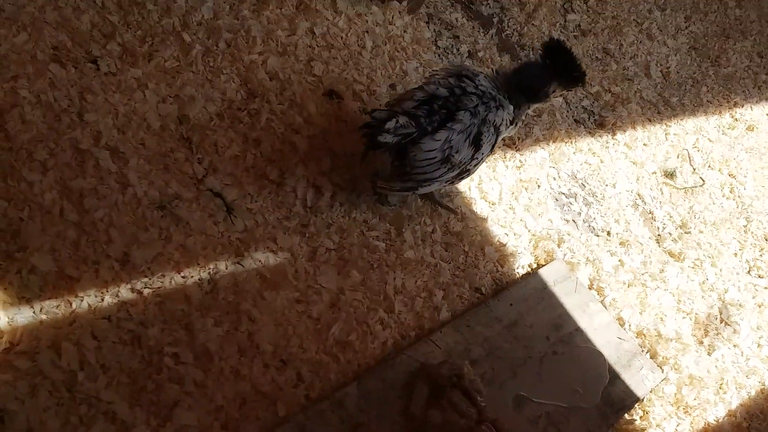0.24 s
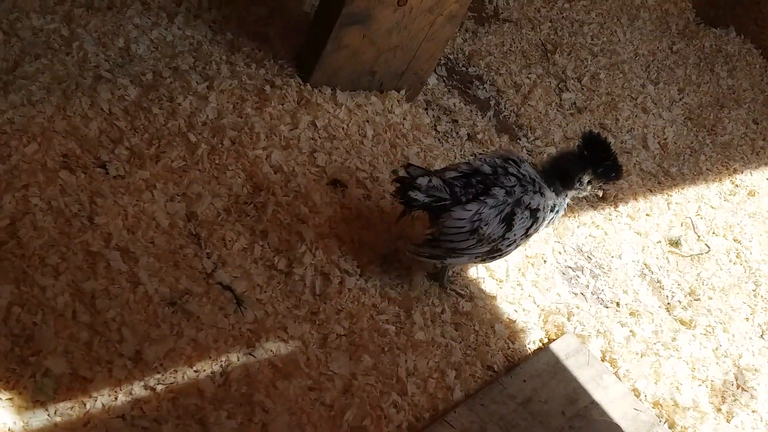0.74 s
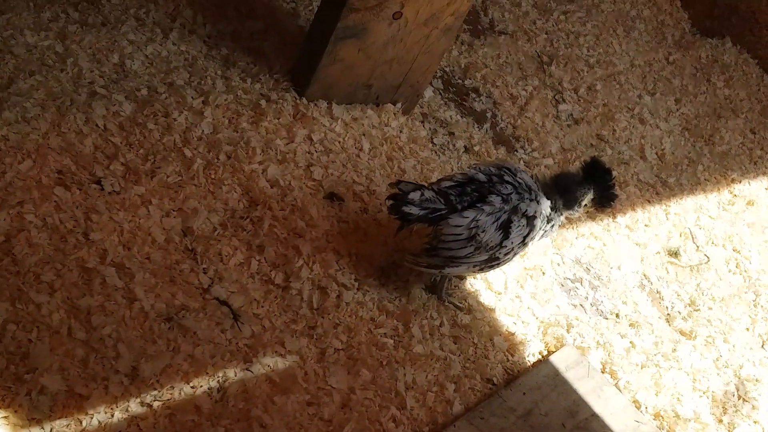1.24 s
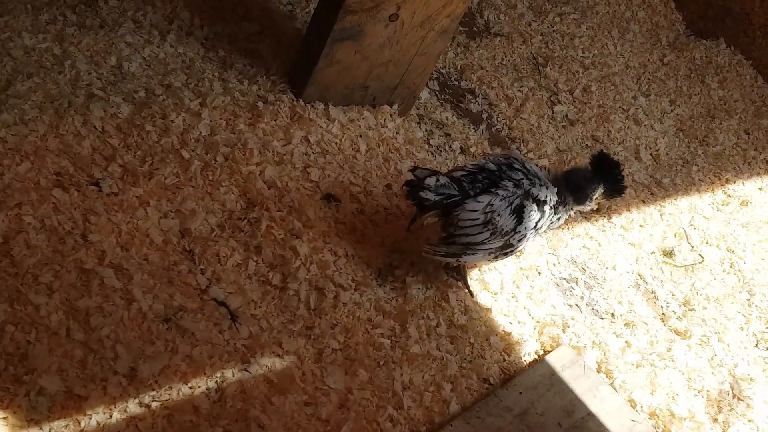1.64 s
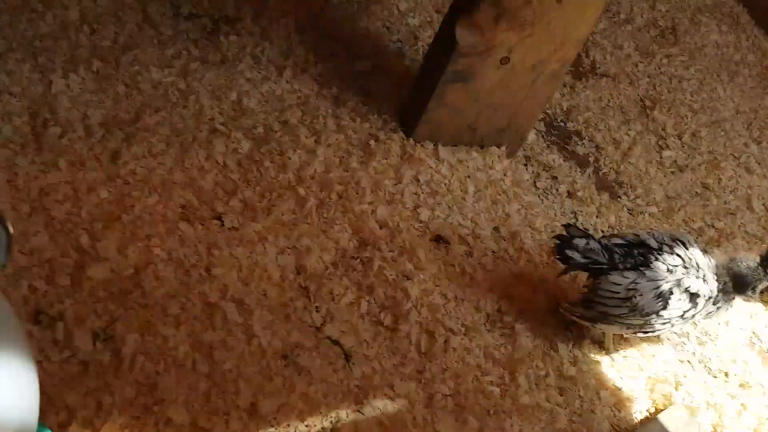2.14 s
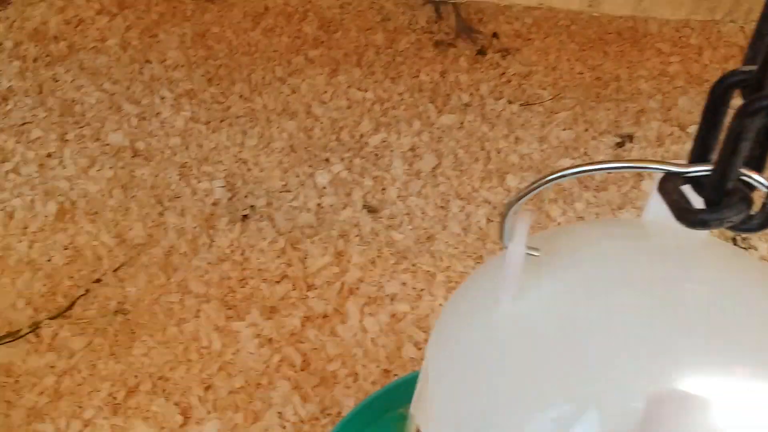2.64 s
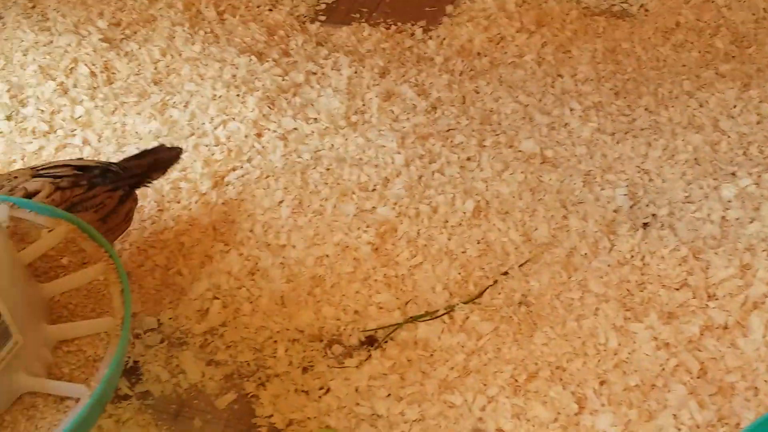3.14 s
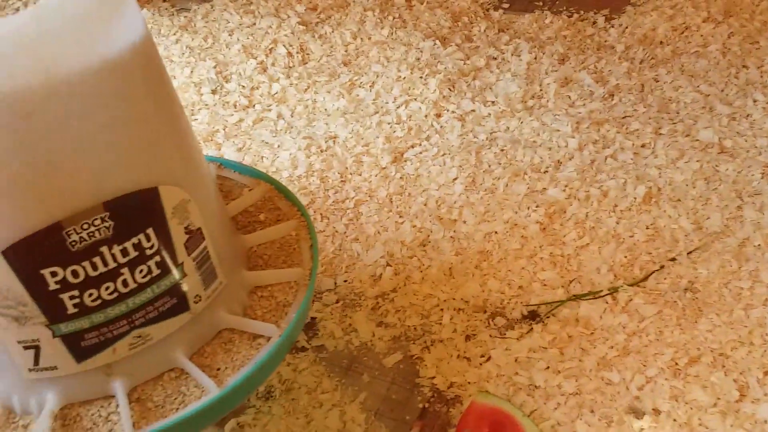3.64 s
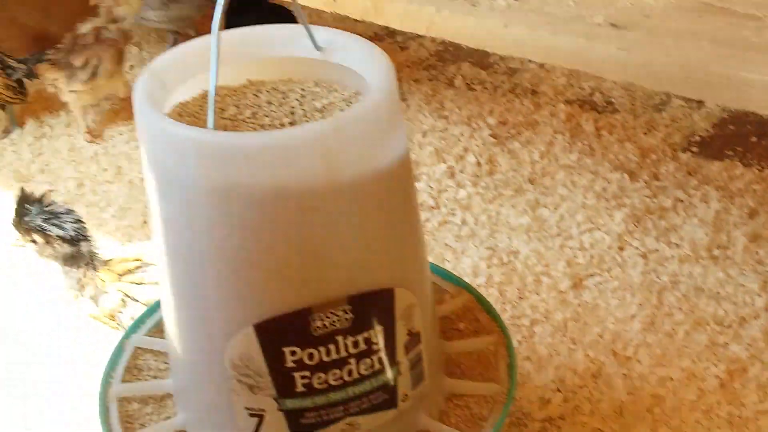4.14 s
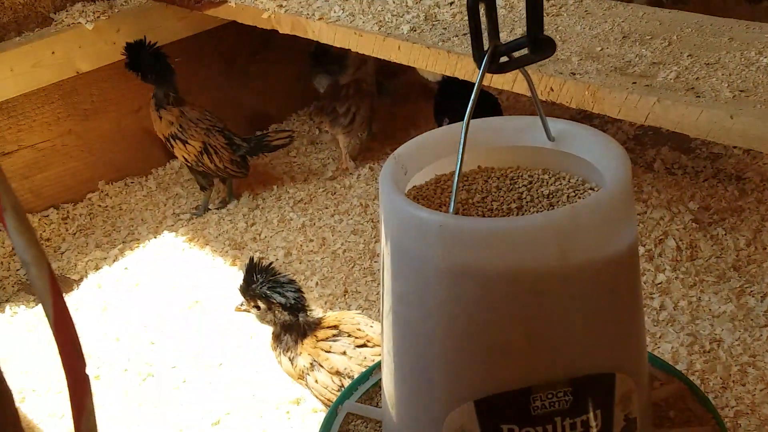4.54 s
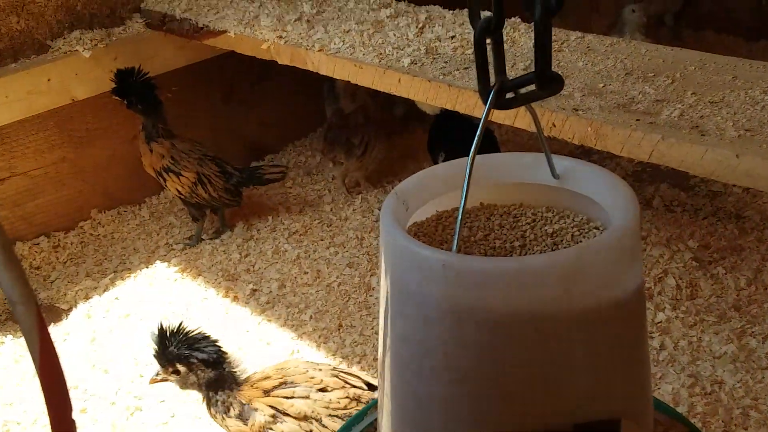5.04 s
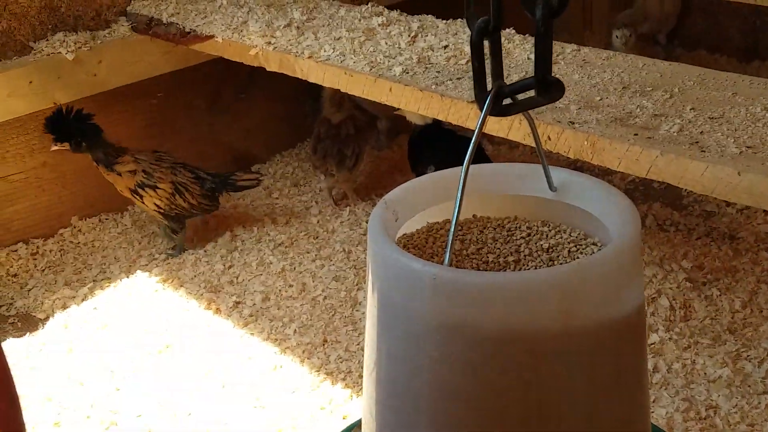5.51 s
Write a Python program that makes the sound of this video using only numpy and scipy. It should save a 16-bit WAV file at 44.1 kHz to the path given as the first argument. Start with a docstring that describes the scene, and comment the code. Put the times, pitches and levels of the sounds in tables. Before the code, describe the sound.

In a small wooden coop, chicks peep from the start: tiny whistles falling from roughly 3-4 kHz to 2 kHz, irregular and often overlapping, with a short close echo. Beneath lie a faint low murmur, fine litter hiss, soft board rumbles and light scuffs in shavings. At 1.5 s one piercing squeak plunges and rings through the coop, with a weaker one at 1.7 s. Handling noise bursts in around 2.0-2.4 s: a dull bump, a sharp nail click and rasping finger strokes on the left, then darker rubbing and the heaviest thumps on the right. Lighter leftward rubs follow until 3.2 s, with small ticks near 2.9-3.0 s, and another brushes past at 3.9 s. Peeps continue busily from 2.3 to 5 s, now leaning right, joined by soft low notes from older birds. A faint hoarse chirr comes at 5.15 s, a low cluck at 5.3 s, then near quiet and two faint peeps around 5.65 s.

```python
"""In a small wooden coop, young chickens peep: short falling whistles that overlap and smear between the walls.
Each call is a gliding tone with overtones, convolved with random wall reflections and a diffuse tail.
Older birds add soft low notes, and coloured noise makes the litter, the feet in the shavings and the boards.
At the hand-held camera itself, a finger rubs first one microphone port, then the other; its case bumps
and clicks as decaying sines."""
import sys
import numpy as np
from scipy import signal
from scipy.fft import rfft, irfft, next_fast_len
from scipy.io import wavfile
from scipy.ndimage import map_coordinates

SR = 44100
rng = np.random.default_rng(int(sys.argv[2]) if len(sys.argv) > 2 else 0)


def generate_wav(sig):
    """Save sig (samples, or channels by samples) to the path in sys.argv[1] as 16-bit PCM at SR."""
    pcm = np.round(np.clip(np.atleast_2d(sig).T, -1, 1) * 32767).astype(np.int16)
    wavfile.write(sys.argv[1], SR, pcm)


N = 254699
TIME = np.arange(N) / SR  # seconds


def amp(db):
    """Decibels to a linear gain."""
    return 10 ** (np.asarray(db) / 20)


def unit(x):
    """Scale a sound to an rms of 1."""
    return x / np.sqrt(np.mean(x ** 2) + 1e-20)


def along(points, hz):
    """Read a curve of (Hz, value) points on a log frequency axis."""
    point_hz, values = np.transpose(points)
    return np.interp(np.log(hz + 1), np.log(point_hz + 1), values)


def wobble(rate, size=N):
    """A smooth random curve with this many random knots a second."""
    knots = rng.standard_normal(int(size * rate / SR) + 4)
    return map_coordinates(knots, [np.arange(size) * rate / SR])


def filtered(x, response):
    """Multiply the spectrum by a response of frequency."""
    size = next_fast_len(N + 8192)
    spectrum = rfft(x, size) * response(np.fft.rfftfreq(size, 1 / SR))
    return irfft(spectrum, size)[..., :N]


def panned(balance_db):
    """Left and right gains of mean power 1; a positive balance leans left."""
    return unit(amp([[balance_db / 2], [-balance_db / 2]]))


def add(track, s, sound):
    """Mix a sound into the track at s seconds, cutting what falls outside."""
    start = round(s * SR)
    part = sound[..., max(-start, 0):N - start]
    first = max(start, 0)
    track[..., first:first + part.shape[-1]] += part


# How alike the two ports hear a noise. Each row: frequency in Hz, left-right likeness (1 is identical).
LIKENESS = [(60, 0.9), (200, 0.92), (700, 0.53), (3000, 0.078), (10000, 0.33)]


def noise(gain_db, alike=LIKENESS):
    """Stereo noise of rms 1, coloured by a dB function of frequency; mid and side set its width."""
    def turn(hz):
        return np.arccos(np.clip(along(alike, hz), -1, 1)) / 2

    def mid_and_side(hz):
        return amp(gain_db(hz)) * [np.cos(turn(hz)), np.sin(turn(hz))]
    mid, side = filtered(rng.standard_normal((2, N)), mid_and_side)
    return unit(np.array([mid + side, mid - side]))


def swells(rows):
    """A soft half-sine hump of gain for each (start s, length s, dB) row."""
    gain = 0
    for s, length, db in rows:
        gain = gain + amp(db) * np.sin(np.pi * np.clip((TIME - s) / length, 0, 1))
    return gain


# Colour of the coop's air and litter. Each row: frequency in Hz, relative gain in dB.
COOP_COLOUR = [(15, -54), (25, -18.5), (110, 3), (205, -14.5), (670, -11.5), (878, -9.5), (1090, -16),
               (1180, -13), (1430, -13.5), (1970, -18), (3120, -22), (4300, -25.5), (7180, -27),
               (9410, -30.5), (15700, -26.5)]
# The litter's hiss as it comes and goes. Each row: time in seconds, level in dB before hiss_db.
LITTER_LEVEL = [(0, -68.5), (.35, -73.5), (.7, -71), (1.3, -71), (1.7, -76.5), (2.2, -70), (3.1, -71.5),
                (3.45, -65.5), (3.8, -69), (4.15, -66), (4.5, -76.5), (5.05, -73), (5.78, -77)]


def background(murmur_db=-65, murmur_follows=0.44, hiss_db=6, split_hz=3500, balance_db=-2):
    """The litter's fine hiss and the coop's low murmur, which partly follows the hiss in level."""
    level_db = np.interp(TIME, *np.transpose(LITTER_LEVEL))
    murmur = noise(lambda hz: along(COOP_COLOUR, hz) - 10 * np.log10(1 + (hz / split_hz) ** 4))
    hiss = noise(lambda hz: along(COOP_COLOUR, hz) - 10 * np.log10(1 + (split_hz / (hz + 1)) ** 4))
    follow_db = murmur_follows * (level_db - level_db.mean())
    murmur = murmur * amp(murmur_db + follow_db + wobble(12))
    hiss = hiss * amp(level_db + hiss_db + 0.64 * wobble(23))
    return panned(balance_db) * (murmur + hiss)


# Weight shifting on the floor boards. Each row: start in seconds, length in seconds, level in dB.
TREAD_TIMES = [(0, 0.081, -60), (.54, 0.053, -61.5), (.66, 0.16, -61), (.79, 0.073, -60.5),
               (1.27, 0.11, -57), (2.8, 0.061, -62.5)]
# Colour of the boards. Each row: frequency in Hz, relative gain in dB.
BOARD_COLOUR = [(30, -11), (70, 8), (130, -1.5), (270, -5), (400, -1.5), (600, -12.5), (1050, -10),
                (2000, -62), (5000, -50)]


def treads(uneven_db=2):
    """The wooden floor rumbles softly under the litter: humps of uneven low noise."""
    rumble = amp(uneven_db * wobble(50.55)) * noise(lambda hz: along(BOARD_COLOUR, hz))
    return swells(TREAD_TIMES) * unit(rumble)


# Scuffs of feet in the shavings. Each row: start in seconds, length in seconds, level in dB.
SCUFF_TIMES = [(0, 0.076, -58), (.75, 0.084, -59), (1.12, 0.19, -64.5), (1.77, .09, -65),
               (2.86, 0.074, -64), (3.29, 0.15, -61), (3.5, 0.24, -61), (3.95, 0.21, -74),
               (4.2, 0.18, -65.5), (5.3, 0.1, -66.5)]
# Colour of the wood shavings. Each row: frequency in Hz, relative gain in dB.
SHAVING_COLOUR = [(500, -21), (1500, -19.5), (4000, 10.5), (5500, 6), (7500, 6.5), (9500, 1), (12000, 10.5),
                  (16000, -16)]


def shavings(grain_db=2.0, lumps_db=1.43):
    """Many tiny flakes slip at once under a foot: noise with a fine and a slow random grain."""
    grain = amp(grain_db * wobble(860) + lumps_db * wobble(32))
    return swells(SCUFF_TIMES) * unit(grain * noise(lambda hz: along(SHAVING_COLOUR, hz)))


# Finger strokes right on the microphone ports. Each row: start in seconds, length in seconds, mid-stroke level
# in dB, swell over the stroke in dB, left-right balance in dB, share of the port covered (0-1).
RUB_STROKES = [(2.066, 0.22, -37.5, 5, -15.5, 0.34), (2.24, 0.092, -41, -5, 11.5, 0.79),
               (2.305, 0.099, -40, -19, 15, 0.83), (2.594, 0.16, -45.5, -4.5, -13, 0.11),
               (2.716, 0.23, -55, 5, -21, 0.39), (2.933, 0.29, -59, -7, -20, 0.1),
               (3.927, 0.23, -54, 4.5, -9, 0.01)]
# Colour of the rubbing skin. Each row: frequency in Hz, relative gain in dB.
SKIN_COLOUR = [(30, -45), (80, -22), (130, 3), (320, -9.5), (550, -4.5), (780, -0.5), (1000, -5.5),
               (1500, -8.5), (2750, -5.5), (4000, -18.5), (5600, -28.5), (7600, -27), (9300, -31.5),
               (12000, -27), (15700, -32)]
# Bass and treble tilt. Each holds: dB with the port open, dB with the port covered.
PORT_BASS_DB = [-11, 15]
PORT_TREBLE_DB = [14, -17.5]
RUB_RISE_S, RUB_FALL_SHARE = 0.024, 0.24  # the finger lands fast and lifts over the last part of its stroke


def finger(grain_db=2, lumps_db=1.23, bass_hz=300, treble_hz=3500):
    """Skin drags over the case in fine slips; a covered port sounds darker."""
    out = np.zeros((2, N))
    alike = [(100, 0.24), (700, 1.0), (3000, 0.33), (9000, 0.76)]  # (Hz, left-right likeness)
    for s, length, db, swell_db, balance_db, covered in RUB_STROKES:
        bass_db = np.interp(covered, [0, 1], PORT_BASS_DB)
        treble_db = np.interp(covered, [0, 1], PORT_TREBLE_DB)

        def colour(hz):
            bass = bass_db / (1 + (hz / bass_hz) ** 4)
            treble = treble_db * hz ** 2 / (hz ** 2 + treble_hz ** 2)
            return along(SKIN_COLOUR, hz) + bass + treble
        grain = amp(grain_db * wobble(400) + lumps_db * wobble(60))
        slips = unit(noise(colour, alike=alike) * grain)
        progress = np.clip((TIME - s) / length, 0, 1)
        landing, lifting = (TIME - s) / RUB_RISE_S, (1 - progress) / RUB_FALL_SHARE
        contact = np.clip(np.minimum(landing, lifting), 0, 1)
        out += panned(balance_db) * contact * amp(db + swell_db * (progress - .5)) * slips
    return out


# Dull bumps on the camera in the hand. Each row: start in seconds, level in dB before the soft onset,
# pitch in Hz, left-right balance in dB.
BODY_BUMPS = [(0.965, -29, 133, -15), (1.993, -32, 144, -12), (2.089, -28, 164, -17),
              (2.331, -14.5, 194, 17), (2.35, -12.5, 131, 13), (2.372, -22, 199, 18)]
# Soft low thumps. Each row: start in seconds, level in dB before the soft onset.
LOW_THUMPS = [(.018, -40), (.799, -51), (3.563, -40), (4.275, -49), (5.353, -40.5)]
# Fingernail on the case. Each row: start in seconds, level in dB.
NAIL_CLICKS = [(2.0848, -15.5), (2.894, -50), (2.987, -37)]
# Ringing modes of the case. Each row: frequency in Hz, relative level in dB, 60 dB decay time in seconds.
CASE_MODES = [(1010, -31, 0.0015), (2480, -21, 0.0032), (2900, -26, 0.008), (7260, -36.5, 0.0031)]
BUMP_T60_S = 0.047
THUMP_HZ, THUMP_T60_S = 121.4, .14


def camera_body(attack=0.015, click_balance_db=-12):
    """The grip bumps the case and low thumps reach it; a nail ticks on it: all decaying sines."""
    out, t = np.zeros((2, N)), np.arange(SR // 4) / SR

    def ring(hz, db, t60):
        return amp(db - 60 * t / t60) * np.sin(2 * np.pi * hz * t)
    soft = 1 - np.exp(-t / attack)
    for s, db, hz, balance_db in BODY_BUMPS:
        add(out, s, panned(balance_db) * ring(hz, db, BUMP_T60_S) * soft)
    for s, db in LOW_THUMPS:
        add(out, s, ring(THUMP_HZ, db, THUMP_T60_S) * soft)
    tick = sum(ring(*mode) for mode in CASE_MODES)
    tick = tick / np.abs(tick).max()
    for s, db in NAIL_CLICKS:
        add(out, s, panned(click_balance_db) * amp(db) * tick)
    return out


def handling(low_hz=60):
    """Rubs and bumps on the camera come through with little deep bass: a second-order high-pass."""
    return filtered(finger() + camera_body(), lambda hz: (1j * hz / (low_hz + 1j * hz)) ** 2)


# A hoarse chirr. Each row: start in seconds, length in seconds, level in dB.
CHIRR_TIMES = [(5.15, 0.13, -55)]
# Colour of the hoarse throat. Each row: frequency in Hz, relative gain in dB.
THROAT_COLOUR = [(750, -22), (1050, 3), (1300, -2), (1800, -14), (2800, -8), (3700, -3), (4400, -19),
                 (7000, -28)]


def chirr(rough_db=3, balance_db=-6):
    """A hoarse, pitchless call: throat-coloured noise with a rough level."""
    rasp = unit(amp(rough_db * wobble(130)) * noise(lambda hz: along(THROAT_COLOUR, hz)))
    return panned(balance_db) * swells(CHIRR_TIMES) * rasp


# Ringing of the coop walls. Each row: frequency in Hz, 60 dB decay time in seconds.
WALL_DECAY = [(1000, 0.21), (3000, 0.15), (8000, 0.16)]


def coop_echo(wet_db, wall_db, shared=0.45, gap=0.0024, first_s=.004, last_s=.03, count=5):
    """The direct sound, a few distinct wall reflections and a diffuse tail."""
    hz, t, bins = signal.stft(rng.standard_normal((3, SR // 4)), SR, nperseg=128)
    decay = amp(-60 * t / along(WALL_DECAY, hz)[:, None])
    tails = signal.istft(bins * decay, SR, nperseg=128)[1]
    shared = np.clip(shared, 0, 1)  # how much of the tail both ports have in common
    tail = np.sqrt(shared) * tails[2] + np.sqrt(1 - shared) * tails[:2]
    # the diffuse tail takes a moment to build
    tail = tail * (1 - np.exp(-(np.arange(tail.shape[1]) / SR / gap) ** 2))
    echo = amp(wet_db) * tail / np.linalg.norm(tail[0])
    for place, side, size in rng.random((count, 3)):
        delay = SR * (first_s + (last_s - first_s) * place)
        lag = 10 * (side - .5)  # samples by which the reflection leads at one port and trails at the other
        strength = amp(wall_db) * (.5 + size) * (1 - place / 2)
        echo[[0, 1], [int(delay - lag), int(delay + lag)]] += strength
    echo[:, 0] = 1
    return echo


# The throat's gain for the fundamental. Each row: frequency in Hz, gain in dB.
VOICE_COLOUR = [(1200, 2.5), (1900, -4), (2450, 2), (3050, -1.5), (3700, -1), (4300, -3), (5000, -19)]
# Colour of the overtones. Each row: frequency in Hz, gain in dB.
OVERTONE_COLOUR = [(2500, 2), (4800, 4.5), (5500, -7.5), (6300, -5.5), (7400, 3.5), (8500, -7), (12000, -47)]


def whistle(length, top_hz, end_hz, crest, fall_share, loudest, overtone_db, rough, flutter_db,
            third_db=-13, linger=1.08):
    """One note of the syrinx: the pitch arches over its crest and slides down, trembling as it goes."""
    size = int(length * SR)
    u = np.linspace(0, 1, size)  # progress through the note
    crest = np.clip(crest, 0, .8)
    from_crest = np.minimum(np.abs((u - crest) / (fall_share - crest)), 1)
    arch = .5 + .5 * np.cos(np.pi * from_crest ** linger)
    tremble = wobble(700, size=size)
    pitch = (end_hz + (top_hz - end_hz) * arch) * (1 + rough * tremble)
    phase = 2 * np.pi * np.cumsum(pitch) / SR
    effort = np.sin(np.pi / 2 * np.interp(u, [0, np.clip(loudest, .02, .98), 1], [0, 1, 0]))

    def partial(order, colour):  # slides through the resonances
        return np.sin(order * phase) * amp(along(colour, order * pitch))
    overtones = partial(order=2, colour=OVERTONE_COLOUR) + amp(third_db) * partial(order=3, colour=OVERTONE_COLOUR)
    tone = partial(order=1, colour=VOICE_COLOUR) + amp(overtone_db) * overtones
    return effort * amp(flutter_db * wobble(243.5, size=size)) * tone


# The camera turns and the birds move to the right. Each row: time in seconds, left-right balance in dB.
FLOCK_BALANCE = [(1.8, 0.5), (2.45, -5)]
SIDE_DB_PER_OCTAVE, USUAL_HZ = 5, 3000  # voices above the middling one stand farther to the left
ATTACK_S, LATEST_PEAK = .035, 0.85  # a call swells this long, but for at most this share of its length
CREST_S = 0.00954  # peeps and low notes crest this soon, then fall
CHICK_ROUGH, OLDER_ROUGH = .02, .055  # trembling as a share of the pitch
FLUTTER_DB = 2.4


def birds(notes, wet_db, wall_db, rough, fall_share, crest_s, far_slope, near_db=-41):
    """Calls of one shape, each from a new spot; the quieter ones are farther off and more echoing."""
    out = np.zeros((2, N))
    for s, length, top_hz, end_hz, db, overtone_db in notes:
        loudest = min(ATTACK_S / length, LATEST_PEAK)
        note = whistle(length, top_hz, end_hz, crest_s / length, fall_share, loudest,
                       overtone_db, rough, FLUTTER_DB)
        echo = coop_echo(wet_db + far_slope * (near_db - db), wall_db=wall_db)
        echo = echo / np.linalg.norm(echo[0])
        octaves = np.log2(top_hz / USUAL_HZ)
        balance_db = np.interp(s, *np.transpose(FLOCK_BALANCE)) + SIDE_DB_PER_OCTAVE * octaves
        in_coop = signal.fftconvolve(note[None], echo, axes=1)
        add(out, s, amp(db) * panned(balance_db) * in_coop)
    return out


# Soft low notes of the older birds. Each row: start in seconds, length in seconds, top pitch in Hz, pitch it
# falls towards in Hz, relative level in dB, overtone level in dB.
OLDER_NOTES = [(.28, 0.03, 1250, 1010, -66.5, -20), (1.95, 0.13, 1450, 1290, -69.5, -19),
               (3.35, 0.039, 1510, 1200, -65.5, -3), (3.69, 0.12, 1348, 1274, -59, -12),
               (4.295, 0.02, 1440, 1112, -51, -8), (4.822, 0.03, 1626, 1207, -57, -27),
               (5.155, 0.105, 1237, 1086, -60.5, -23), (5.322, 0.047, 1357, 1225, -51.5, -14.5),
               (5.66, 0.055, 1586, 1408, -59.5, -10)]


def older_birds():
    """Older birds sing the same falling shape lower, with a rougher pitch; the faintest notes echo most."""
    return birds(OLDER_NOTES, wet_db=-1.5, wall_db=-8, rough=OLDER_ROUGH, fall_share=1.09,
                 crest_s=CREST_S, far_slope=0.4)


# Sharp squeaks. Each row: start in seconds, length in seconds, top pitch in Hz, pitch it falls to in Hz,
# relative level in dB, overtone level in dB.
SHARP_SQUEAKS = [(1.492, 0.026, 4830, 2215, -28.5, -22.5), (1.709, .022, 3590, 2430, -41, -28)]


def squeaks():
    """Short calls that plunge and set the whole coop ringing: strong tail and wall reflections."""
    return birds(SHARP_SQUEAKS, wet_db=7.5, wall_db=2.5, rough=CHICK_ROUGH, fall_share=0.99,
                 crest_s=.012, far_slope=0.068)


# Peeps of the chicks. Each row: start in seconds, length in seconds, top pitch in Hz, pitch it falls towards
# in Hz, relative level in dB, overtone level in dB.
CHICK_PEEPS = [(-.032, 0.049, 2724, 2150, -39.5, -18.5), (0.124, 0.049, 3487, 2390, -48, -13.5),
               (0.144, 0.078, 2950, 2183, -48, -11.5), (0.254, 0.032, 3100, 1990, -49, -18),
               (0.485, 0.043, 2786, 2250, -49, -23), (0.526, 0.072, 3854, 2920, -44, -25.5),
               (0.661, 0.1, 3766, 2360, -40.5, -27.5), (0.767, .052, 3210, 2280, -48.5, -30),
               (0.882, 0.076, 2523, 2000, -42, -21), (0.93, 0.04, 3416, 2560, -48.5, -15),
               (1.159, 0.064, 2720, 2067, -41.5, -21), (1.163, 0.047, 3516, 2660, -49, -17),
               (1.223, 0.043, 3334, 1990, -39, -20.5), (1.249, 0.039, 4300, 3460, -50, -24),
               (1.294, 0.033, 3410, 2840, -40.5, -22), (1.379, 0.029, 2530, 2140, -47.5, -18.5),
               (2.328, 0.048, 3920, 2540, -42, -28), (2.476, 0.064, 3880, 2980, -47.5, -29),
               (2.486, 0.043, 3054, 2590, -41.5, -46), (2.572, 0.069, 2568, 1864, -43.5, -24),
               (2.8, 0.052, 3322, 2420, -48, -18), (2.891, .023, 2513, 2410, -40.5, -38),
               (2.988, 0.051, 3500, 2550, -42.5, -31), (2.993, .038, 2667, 2457, -36.5, -23),
               (3.201, 0.048, 3400, 2526, -39.5, -25), (3.563, 0.023, 3010, 2570, -41, -21),
               (3.692, 0.066, 2460, 2070, -45.5, -20), (3.732, 0.056, 2857, 2582, -43, -28),
               (3.749, 0.043, 3710, 2580, -48, -31), (3.877, .057, 4010, 2385, -41, -27),
               (3.945, 0.039, 2890, 2390, -38.5, -16), (4.006, 0.077, 3767, 2410, -38.5, -33),
               (4.127, 0.028, 3080, 2120, -45.5, -31), (4.292, 0.036, 3326, 2654, -43, -45),
               (4.505, 0.039, 3070, 2110, -51, -17), (4.644, 0.052, 3510, 2020, -55.5, -20),
               (4.708, 0.06, 4100, 2240, -41.5, -29), (4.776, 0.018, 2456, 2170, -49, -26),
               (4.797, 0.024, 2850, 2730, -53.5, -23), (4.843, 0.087, 3820, 2476, -44.5, -31),
               (4.942, 0.08, 3140, 2023, -46.5, -27), (4.998, 0.073, 3930, 2187, -40.5, -27.5),
               (5.637, 0.034, 2920, 2555, -50.5, -11), (5.681, 0.029, 2920, 2310, -52, -18)]


def chicks():
    """Short whistles that crest early and fall, smeared by the walls."""
    return birds(CHICK_PEEPS, wet_db=1, wall_db=-5, rough=CHICK_ROUGH, fall_share=1.08,
                 crest_s=CREST_S, far_slope=0.48)


def scene():
    """The coop's floor of noise, feet and boards, the handled camera, and the birds over it all."""
    around = background() + treads() + shavings()
    calls = amp(4.0) * (older_birds() + squeaks() + chicks())
    return around + handling() + chirr() + calls


def record(dry, top_hz=15800):
    """The camera keeps nothing above its band limit."""
    return filtered(dry, lambda hz: hz < top_hz)


dry = scene()
out = record(dry)
generate_wav(out)
```